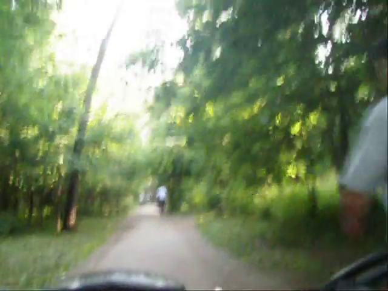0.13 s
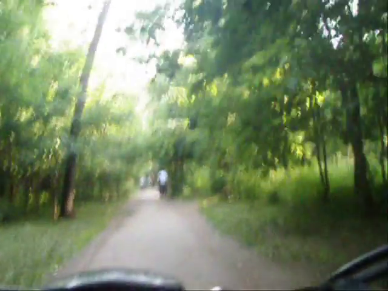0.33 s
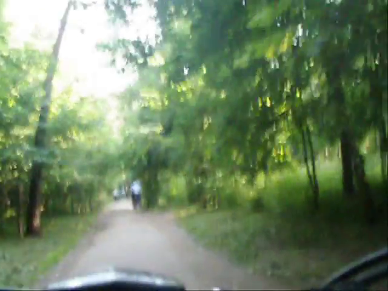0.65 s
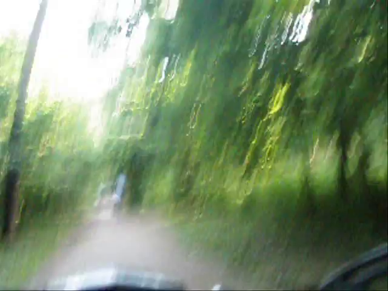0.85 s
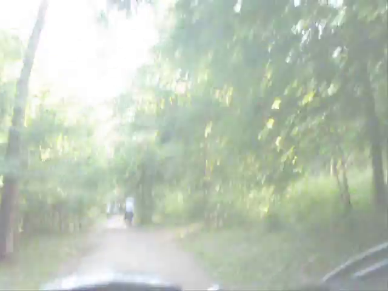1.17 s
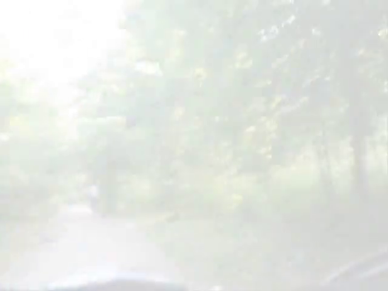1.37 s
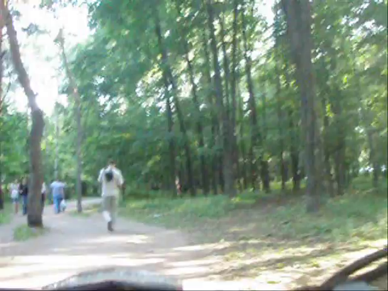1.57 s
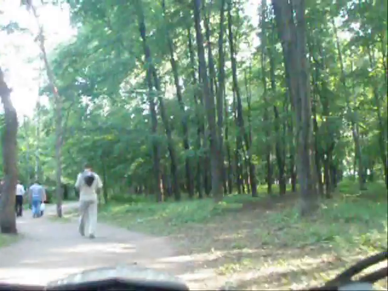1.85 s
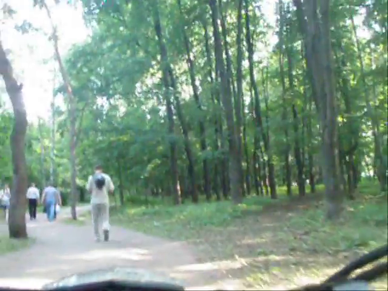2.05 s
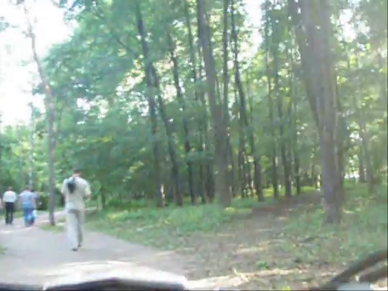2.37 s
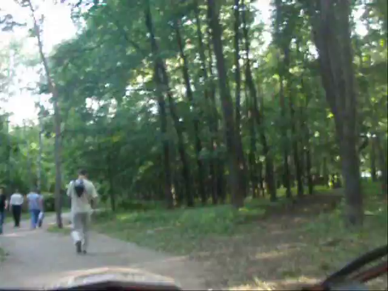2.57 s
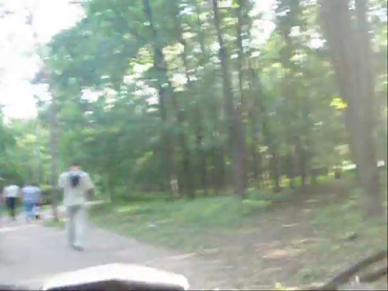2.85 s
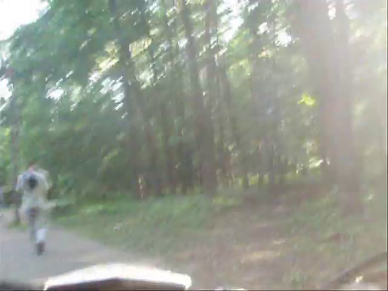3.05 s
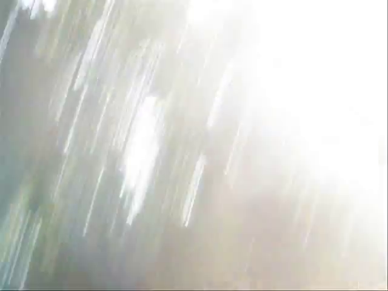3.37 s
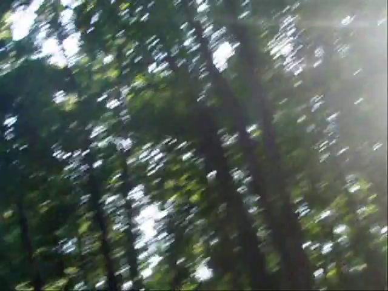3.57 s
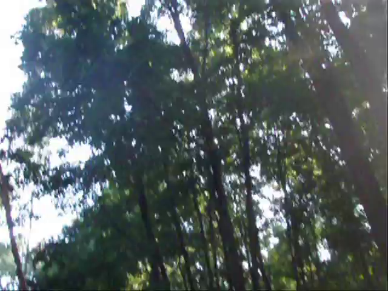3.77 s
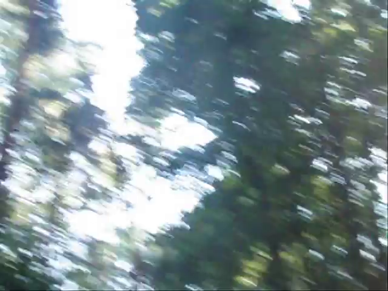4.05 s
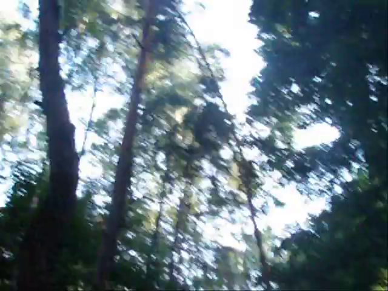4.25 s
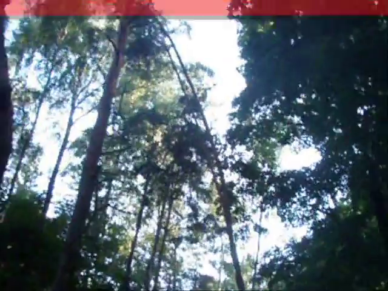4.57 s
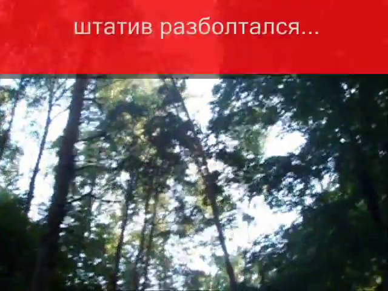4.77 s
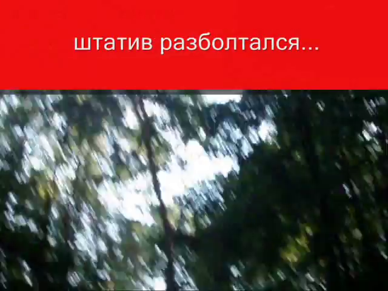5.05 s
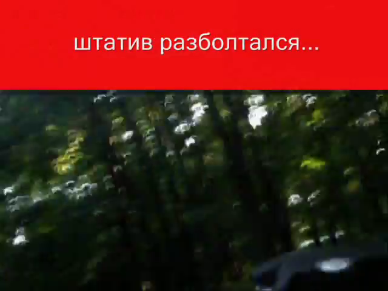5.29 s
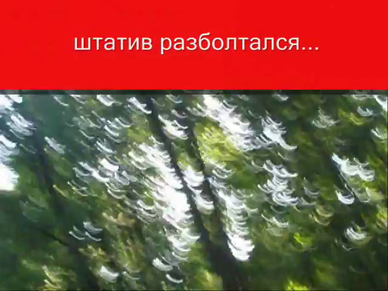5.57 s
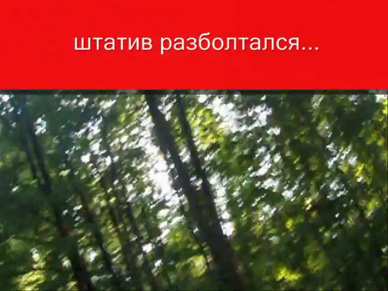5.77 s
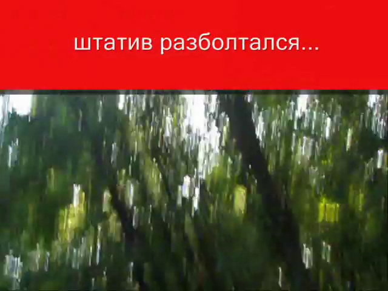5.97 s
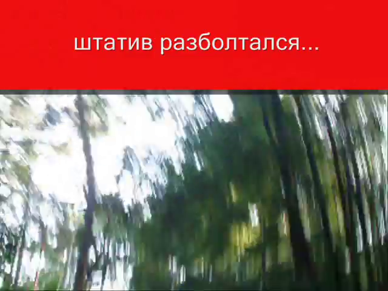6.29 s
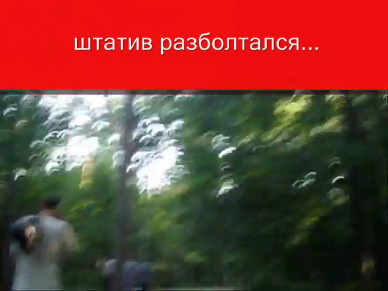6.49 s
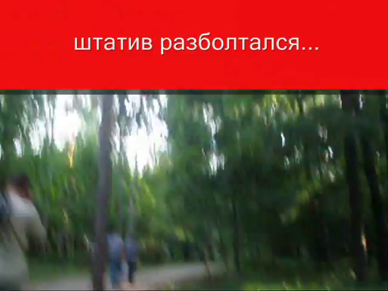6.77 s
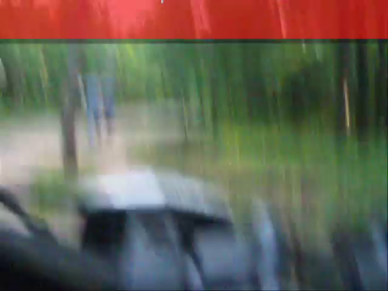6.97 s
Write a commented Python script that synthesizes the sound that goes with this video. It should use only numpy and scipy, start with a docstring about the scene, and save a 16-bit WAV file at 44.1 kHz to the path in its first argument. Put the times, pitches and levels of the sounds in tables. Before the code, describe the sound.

A loose camera mount on a moving bicycle rattles and buzzes with quick clicks and knocks over a steady hum and tyre rumble.

```python
"""A loose handlebar camera mount hums and rattles over a rough path. Stones and jolts ring its arm in
low modes, ripples pump it into a clean tone, and the tyres rumble. The camera knocks against its seat
and a small loose part ticks, over a low flutter of air and faint hiss. The microphone is sampled slowly
and each sample is held, so the whole sound is mirrored into the treble."""
import sys
import numpy as np
from scipy import signal
from scipy.fft import rfft, irfft
from scipy.io import wavfile
from scipy.ndimage import uniform_filter1d, map_coordinates

SR = 44100
rng = np.random.default_rng(int(sys.argv[2]) if len(sys.argv) > 2 else 0)


def bounce(signal):
    """Save signal as a 16-bit WAV file at the path given by the first command-line argument."""
    frames = np.transpose(np.atleast_2d(signal))
    limited = np.clip(frames, -1, 1)
    pcm = np.round(limited * 32767).astype(np.int16)
    wavfile.write(sys.argv[1], SR, pcm)


N = 314433

# resonances of each part: pitch_hz, relative_db, t60_s
ARM_LOW_MODES = [(433.2, -5.5, 0.051), (394, -10, 0.01)]
ARM_HIGH_MODES = [(741, 16, 0.027), (860, -1, 0.011), (614, 5, .015)]
SHELL_MODES = [(965, 6, 0.004), (1342, 7.5, 0.0058), (1808, 4.5, 0.0066), (2055, 0, 0.01),
               (2506, 1, 0.0033)]
LOOSE_PART_MODES = [(3180, -1.1, 0.0053), (3647, -0.75, 0.0072)]


def road_shake():
    """Stones under the tyres drive the arm's hum, a rumble and a fine chatter, all in the same clumps."""
    # the ride along the path: time_s, low_hum_db, rumble_db, bass_boost_db, high_hum_db, chatter_db
    path = [(0.0, -26.5, -28.5, 3, -41, -40), (0.4, -27.5, -34, 15, -46, -39),
            (0.9, -24, -30, 4, -40.5, -39), (1.4, -23.5, -24, 3.5, -42, -34.5),
            (1.8, -25, -27.5, 5.5, -35.5, -39), (2.2, -21.5, -24.5, 5, -35, -36),
            (2.76, -22, -24, 7, -30.5, -38.5), (3.26, -20.5, -25, 8, -36, -35),
            (3.65, -22, -25, -1, -32, -36.5), (4.05, -22, -26, 4, -27.5, -36),
            (4.6, -22, -23, -11, -31, -35.5), (5.1, -24, -29, -2, -18, -31),
            (5.48, -29, -43, -22, -41.5, -35.5), (5.86, -19, -29, -9, -28, -31.5),
            (6.35, -28.5, -42, -8, -32.5, -35), (6.51, -24, -23.5, 0, -25, -36.5),
            (6.75, -21.5, -27.5, 1, -31, -32.5), (7.13, -22.5, -29, -13, -29.5, -30.5)]
    low_hum_db, rumble_db, bass_boost_db, high_hum_db, chatter_db = curves(path)
    drive_gain = lull_gain()
    skips = np.minimum(wobble(54.0), 1.5)  # the tyre skips, so the drive comes in clumps
    stones = bumps(900, spread_db=2.76) * gain_of(0.8 * skips)
    low_hum = arm_hum(stones, gain_of(low_hum_db) * drive_gain, ARM_LOW_MODES)
    high_hum = gain_of(4.8 * skips) * arm_hum(stones, gain_of(high_hum_db) * drive_gain, ARM_HIGH_MODES)
    rumble = drive_gain ** 2.9 * tyre_rumble(rumble_db, bass_boost_db, skips)  # ducks hardest in a lull
    chatter = drive_gain ** 0.97 * gain_of(chatter_db) * shell_chatter(skips)
    return low_hum + high_hum + rumble + chatter


def lull_gain():
    """Gain on the drive: 1 most of the time, lower during each lull in the shaking."""
    # lulls in the shaking: start_s, end_s, drop_db
    lulls = [(0.326, 0.407, 2), (0.597, 0.607, 13), (1.095, 1.162, 5), (1.567, 1.626, 4.5),
             (3.426, 3.574, 10.5), (4.337, 4.379, 2.5), (4.676, 4.767, 3.5), (4.993, 5.071, 6.5),
             (5.347, 5.395, 17.5), (5.41, 5.435, 10), (5.525, 5.57, 8), (6.302, 6.388, 6.5),
             (6.63, 6.67, 13), (6.855, 6.926, 5)]
    t = np.arange(N) / SR
    drop_db = sum(db * ((t > start) & (t < end)) for start, end, db in lulls)
    return gain_of(-uniform_filter1d(drop_db, size=300))


def arm_hum(stones, drive, modes):
    """The arm resonates under a stream of small blows and rings on into a lull."""
    steady_rms = np.sqrt(np.mean(ring(stones, modes) ** 2))
    return ring(drive * stones, modes) / steady_rms


def arm_jolts():
    """Each jolt is one soft push that rings the arm's low and high modes."""
    # jolts from the path: start_s, level_db, high_modes_relative_db
    jolts = [(0.1, -9, -10), (0.225, -16, -10), (0.485, -12, -15), (0.801, -8, -22), (0.902, -13, -3),
             (1.053, -7.5, -22), (1.17, -16, -16), (1.202, -14, -15), (1.305, -11, -12), (1.382, -8, -3),
             (1.455, -10, -7), (1.697, -12.5, -16), (1.784, -10, -13), (1.934, -9, 1), (2.01, -7, -16),
             (2.072, -7, -25), (2.353, -12.5, -19), (2.386, -18, -6), (2.51, -9, -14), (2.591, -2.5, -10),
             (2.619, -12, -3), (2.807, -16, -16), (2.88, -11, -6), (2.919, -19, -23), (2.973, -15, -8),
             (3.231, -9, -17), (3.279, -19, -15), (3.31, -10, -20), (3.39, -15, -27), (3.579, -5, -16),
             (3.634, -13, 4), (3.855, -9, -14), (3.943, -13, -18), (3.969, -11, -12), (4.039, -6, -15),
             (4.084, -8, 4), (4.12, -5.5, -11), (4.192, -12, -12), (4.229, -6, -7), (4.256, -2.5, -9),
             (4.305, -8.5, -7), (4.41, -5.5, -14), (4.533, -8.5, 0), (4.624, -8, -4), (4.854, -8.5, -13),
             (4.898, -13, -6), (4.982, -4.5, -26), (5.066, -9, -26), (5.195, -11.5, -20), (5.4, -17, 1),
             (5.499, -18.5, 3), (5.559, -17, -20), (5.652, -6.5, -20), (5.699, -5, -12), (5.761, -6.5, 3),
             (5.785, -6.5, -7), (5.897, -8.5, -24), (5.941, -18, -4), (5.995, -16, -11), (6.045, -12, -12),
             (6.19, -12, -2), (6.285, -13, -17), (6.391, -28, -2), (6.514, -13, -21), (6.537, -13, -3),
             (6.582, -9.5, 4.5), (6.61, -22, -10), (6.669, -10.5, -2.5), (6.715, -4, -11), (6.93, -15, -2),
             (6.974, -9.5, -1), (7.085, -15, -16)]
    start_s, level_db, high_db = np.transpose(jolts)
    at = np.round(start_s * SR).astype(int)
    low, high = np.zeros((2, N))
    low[at] = gain_of(level_db) * rng.choice([-1, 1], len(at))
    high[at] = low[at] * gain_of(high_db)
    push = signal.windows.hann(30)
    soften = lambda force: np.convolve(force, push / push.sum())[:N]
    return ring(soften(low), ARM_LOW_MODES) + ring(soften(high), ARM_HIGH_MODES)


def ripple_swells():
    """Ripples in the path pump the arm's main low mode into brief, clean tones."""
    # bell-shaped swells: centre_s, length_s, peak_db
    swells = [(0.655, 0.039, -16), (1.066, 0.034, -17), (2.646, 0.1, -9.5), (3.33, 0.073, -14.5),
              (3.413, 0.049, -6), (4.311, 0.067, -10.5), (6.003, 0.025, -7.5), (6.132, 0.031, -9),
              (6.73, 0.06, -17), (6.801, 0.061, -17), (7.092, 0.026, -15)]
    t = np.arange(N) / SR
    envelope = sum(gain_of(db) * np.exp(-(2 * (t - centre) / length) ** 2) for centre, length, db in swells)
    pitch_hz = ARM_LOW_MODES[0][0]
    return envelope * np.sin(2 * np.pi * pitch_hz * t)


def camera_knocks():
    """The camera hits its seat: a dry snap, then the ring of the shell, the arm and the loose part."""
    # knocks on the seat: start_s, level_db
    knocks = [(0.0338, -15.5), (0.1176, -12.5), (0.184, -17.5), (0.2169, -18), (0.2464, -17), (0.2773, -15),
              (0.413, -11.5), (0.4943, -16), (0.5581, -17), (0.6165, -18), (0.7302, -18), (0.8101, -20),
              (0.8933, -18), (0.9308, -18), (1.0794, -17), (1.1712, -11), (1.1987, -20), (1.2471, -11),
              (1.3034, -7), (1.3414, -14), (1.3754, -18), (1.4177, -14), (1.502, -23), (1.5379, -22),
              (1.6252, -14.5), (1.6581, -14), (1.6841, -11), (1.712, -11), (1.7556, -20), (1.7677, -13.5),
              (1.9527, -13), (2.0433, -18), (2.0772, -9), (2.1725, -13.5), (2.2847, -15), (2.3667, -16.5),
              (2.4289, -12), (2.5301, -13.5), (2.9816, -13), (2.9976, -12), (3.0939, -9), (3.1622, -14),
              (3.2181, -17), (3.243, -10), (3.2954, -23), (3.4366, -5), (3.5024, -21), (3.5753, -20.5),
              (3.6042, -10), (3.6254, -7), (3.698, -14), (3.8641, -13), (3.8866, -7.5), (3.9085, -8),
              (4.0422, -4), (4.0806, -4.5), (4.115, -9.5), (4.1295, -5.5), (4.2273, -19), (4.2512, -11),
              (4.2812, -10.5), (4.3041, -9.5), (4.3221, -5), (4.339, -12), (4.4423, -7.5), (4.6758, -8),
              (4.6846, -13), (4.7995, -11.5), (4.9796, -15), (4.9886, -10), (5.0594, -16), (5.094, -12),
              (5.1352, -3.5), (5.234, -9.5), (5.2444, -8.5), (5.3083, -12), (5.3278, -14.5), (5.3986, -14),
              (5.4425, -9.5), (5.4587, -11.5), (5.5044, -4.5), (5.5478, -21), (5.6151, -5), (5.6496, -10.5),
              (5.6645, -10), (5.682, -3), (5.7578, -13.5), (5.7987, -12), (5.8466, -8), (5.9369, -14),
              (6.0097, -8), (6.0691, -8.5), (6.135, -11), (6.1704, -8.5), (6.2282, -7.5), (6.2462, -6.5),
              (6.262, -22), (6.2796, -8.5), (6.3245, -18), (6.3809, -13), (6.4318, -20), (6.4697, -8.5),
              (6.5086, -15.5), (6.5515, -9), (6.5819, -18), (6.5959, -4), (6.6134, -9), (6.6677, -14),
              (6.6967, -25), (6.7764, -13), (6.8379, -8), (6.8882, -2.5), (6.9731, -13), (6.9958, -13),
              (7.0564, -12)]
    start_s, level_db = np.transpose(knocks)
    snap_db, snap_ms, shell_db = -12, 0.26, -7.5
    force, mode_forces = np.zeros(N + 800), np.zeros((len(SHELL_MODES), N + 800))
    # each spot struck favours other modes
    spots = gain_of(2.75 * rng.standard_normal((len(knocks), len(SHELL_MODES), 1)))
    blows = impacts(contact_ms=1.3 * gain_of(0.4 * (level_db + 22)))  # harder knocks last longer
    for at, db, blow, spot in zip(np.round(start_s * SR).astype(int), level_db, blows, spots):
        force[at:at + 800] += gain_of(db) * blow
        mode_forces[:, at:at + 800] += gain_of(db + shell_db) * unit_rms(spot) * blow
    age = np.arange(200) / SR * 1000 / snap_ms
    snap = gain_of(snap_db) * signal.oaconvolve(force, (1 - age) * np.exp(-age))[:N]
    shell = sum((-1) ** k * gain_of(mode[1]) * ring(mode_forces[k], [mode])
                for k, mode in enumerate(SHELL_MODES))
    arm = gain_of(-1.5) * ring(mode_forces[0], ARM_HIGH_MODES)
    loose_part = gain_of(-16.0) * ring(mode_forces[-1], LOOSE_PART_MODES)
    return snap + shell + arm + loose_part


def loose_part_ticks():
    """The small part strikes its stop with a bright tick that also rings the shell."""
    # strikes on the stop: start_s, level_db
    ticks = [(0.0094, -21), (0.0453, -25), (0.086, -15.5), (0.146, -18), (0.2299, -18.5), (0.2468, -17),
             (0.2996, -16.5), (0.338, -19), (0.4389, -15.5), (0.4663, -23.5), (0.514, -21), (0.5787, -20.5),
             (0.6663, -17.5), (0.7098, -16.5), (0.7597, -17), (0.8103, -19.5), (0.8398, -21),
             (0.8595, -20.5), (0.9053, -15), (0.9626, -18), (1.0171, -16.5), (1.038, -22), (1.0909, -16),
             (1.1732, -14), (1.2135, -13), (1.2473, -22), (1.279, -20), (1.432, -18.5), (1.477, -22),
             (1.502, -26), (1.5625, -24.5), (1.625, -25), (1.6596, -23), (2.0792, -25), (2.9, -23.5),
             (3.138, -23), (3.2196, -14.5), (3.2715, -16), (3.441, -15.5), (3.477, -25), (4.13, -31),
             (4.442, -20), (4.6753, -13.5), (5.097, -21), (5.1058, -19), (5.225, -25), (5.2375, -13.5),
             (5.2849, -17), (5.3083, -18.5), (5.3981, -20.5), (5.4151, -30), (5.5074, -16), (5.5468, -26),
             (5.683, -28), (6.1772, -20), (6.245, -23), (6.2797, -11.5), (6.3814, -23), (6.5955, -16),
             (6.6156, -21), (6.8384, -18), (6.8927, -26)]
    force = np.zeros(N + 800)
    blows = impacts(contact_ms=np.full(len(ticks), 1.0))
    for (start_s, level_db), blow in zip(ticks, blows):
        force[round(start_s * SR):][:800] += gain_of(level_db) * blow
    return gain_of(2.5) * ring(force, LOOSE_PART_MODES) + gain_of(-1.5) * ring(force, SHELL_MODES)


def tyre_rumble(level_db, bass_boost_db, skips):
    """Dense bumps under the tyres blur into a dark, uneven roll."""
    # tone of the roll: frequency_hz, gain_db
    rumble_eq = [(25, -40), (55, -8), (90, -10), (150, -2), (300, -2), (500, -6), (700, -9), (1100, -73),
                 (2000, -27)]
    bass_top_hz = 133
    roll = unit_rms(equalise(bumps(1200, spread_db=2.0), rumble_eq))
    bass = signal.filtfilt(*signal.butter(2, bass_top_hz, fs=SR), roll)
    envelope = gain_of(level_db + 2.0 * skips + 3.46 * wobble(31.6))
    return envelope * (roll + (gain_of(bass_boost_db) - 1) * bass)


def shell_chatter(skips):
    """Tiny, rapid blows keep the shell and the loose part buzzing."""
    grit = gain_of(2.6 * skips + 1.23 * wobble(88.0))
    shell = unit_rms(ring(grit * bumps(2500, spread_db=4.5), SHELL_MODES))
    part_force = grit * bumps(2500, spread_db=0.9) * gain_of(4.6 * wobble(57.0))
    return shell + gain_of(-6.0) * unit_rms(ring(part_force, LOOSE_PART_MODES))


def wind():
    """A low flutter of air that fades steadily."""
    # tone of the air: frequency_hz, gain_db
    wind_eq = [(15, 6), (70, -2), (200, -74)]
    start_db, fade_db_per_s = -30.5, 3.5
    envelope = gain_of(start_db - fade_db_per_s * np.arange(N) / SR)
    return envelope * unit_rms(equalise(rng.standard_normal(N), wind_eq))


def impacts(contact_ms):
    """Force of each blow: one hard crack amid a flurry of tiny contacts that swells and dies."""
    crack_energy_share, crack_delay_ms, contact_spread_db = 0.6, 0.6, 3
    draws = rng.standard_normal((len(contact_ms), 801))
    flurry_ms = np.clip(contact_ms[:, None] * gain_of(contact_spread_db * draws[:, :1]), .2, 6)
    age = np.arange(800) / SR * 1000 / flurry_ms
    flurry = draws[:, 1:] ** 3 * np.sqrt(age) * np.exp(-age)
    flurry /= np.linalg.norm(flurry, axis=1)[:, None]
    crack = np.sign(draws[:, 1:2]) * (np.arange(800) == round(crack_delay_ms * SR / 1000))
    return np.sqrt(crack_energy_share) * crack + np.sqrt(1 - crack_energy_share) * flurry


def ring(force, modes):
    """The force sets off one dying sine per mode; a unit blow peaks at 1."""
    t = np.arange(SR // 8) / SR
    body = sum((-1) ** k * gain_of(db - 60 * t / max(t60, .002)) * np.sin(2 * np.pi * hz * t)
               for k, (hz, db, t60) in enumerate(modes))
    return signal.oaconvolve(force, body / abs(body).max())[:N]


def bumps(per_s, spread_db):
    """Random blows of either sign, a few of them large."""
    chance, size, sign = rng.random((3, N))
    strength = gain_of(-spread_db * np.log(np.maximum(size, .015)))
    return (chance < per_s / SR) * np.sign(sign - .5) * strength


def wobble(rate_hz):
    """Smooth random modulation of rms 1, about rate_hz swings a second."""
    width = round(SR / rate_hz)
    return unit_rms(uniform_filter1d(uniform_filter1d(rng.standard_normal(N), width), width))


def curves(rows):
    """Draws one automation curve per column through the times in the first."""
    time_s, *columns = np.transpose(rows)
    return [np.interp(np.arange(N) / SR, time_s, column) for column in columns]


def equalise(x, points):
    """Shapes the spectrum through points of frequency_hz, gain_db."""
    hz, db = np.transpose(points)
    bins = np.fft.rfftfreq(len(x), 1 / SR)
    curve_db = np.interp(np.log(bins + 1), np.log(hz + 1), db)
    return irfft(rfft(x) * gain_of(curve_db), len(x))


def gain_of(db):
    return 10 ** (np.asarray(db) / 20)


def unit_rms(x):
    return x / np.sqrt(np.mean(x ** 2) + 1e-20)


def scene():
    """The shaking mount and rattling camera over air and microphone hiss, in mono."""
    hiss = gain_of(-54.0) * rng.standard_normal(N)
    background = wind() + hiss
    mount = road_shake() + ripple_swells() + arm_jolts()
    return (mount + camera_knocks() + loose_part_ticks() + background)[None]


def record(dry):
    """The input is filtered and softly clipped; sample-and-hold mirrors it into the treble."""
    # microphone and filter ahead of the sampler: frequency_hz, gain_db
    input_eq = [(10, -28), (50, -13.5), (120, 0), (3500, 2), (3700, -0.5), (3850, -4), (3950, -27),
                (4050, -30), (4400, -60)]
    hold_hz, cutoff_hz, dc_offset = 8000, 15440, -.0039
    rounded = np.tanh(0.84 * equalise(dry[0], input_eq)) / 0.8  # the amplifier rounds off big blows
    taken_at = np.floor(np.arange(N) * hold_hz / SR) * SR / hold_hz
    held = map_coordinates(rounded, taken_at[None], order=3) + dc_offset
    lowpass = signal.firwin(801, cutoff_hz, window=("kaiser", 8), fs=SR)
    return signal.oaconvolve(held, lowpass, "same")[None]


dry = scene()
out = record(dry)
bounce(out)
```